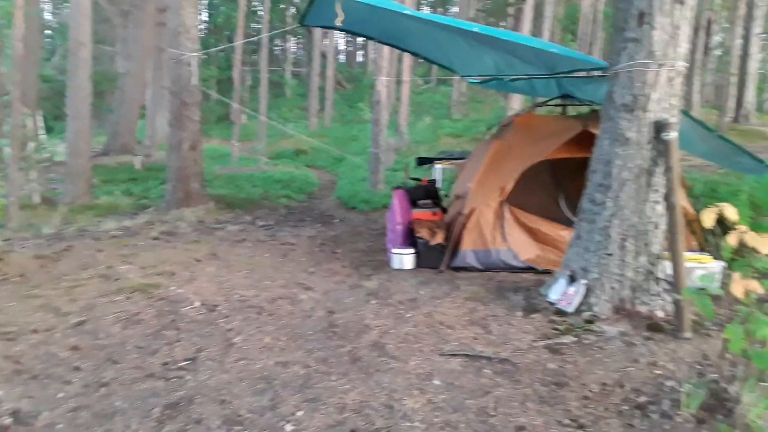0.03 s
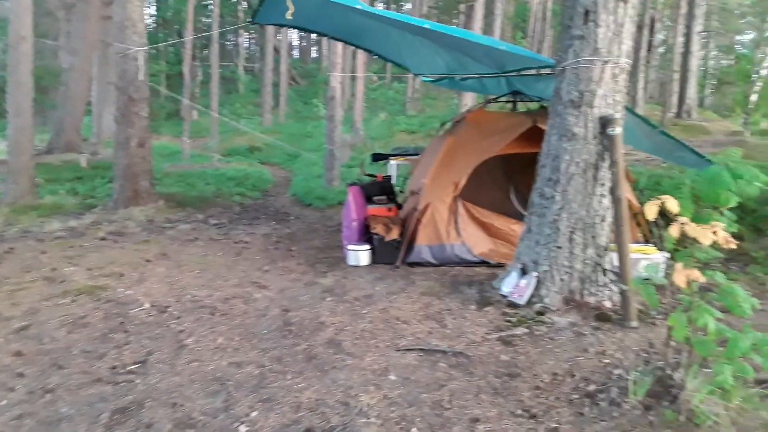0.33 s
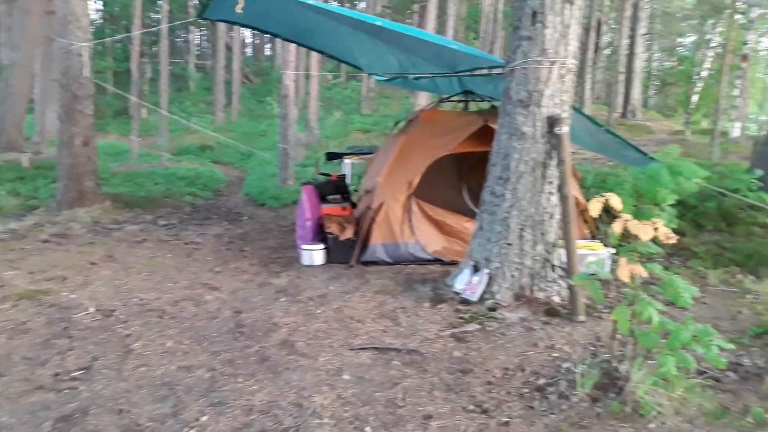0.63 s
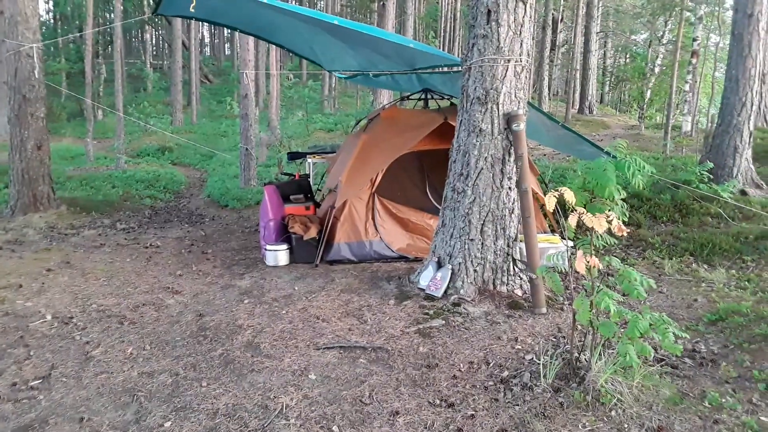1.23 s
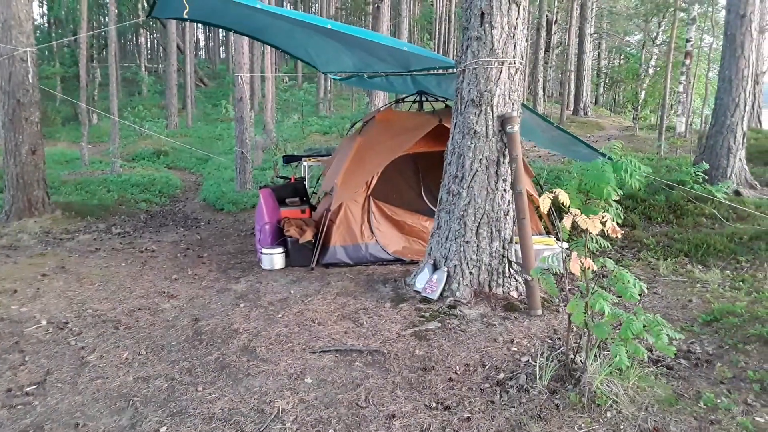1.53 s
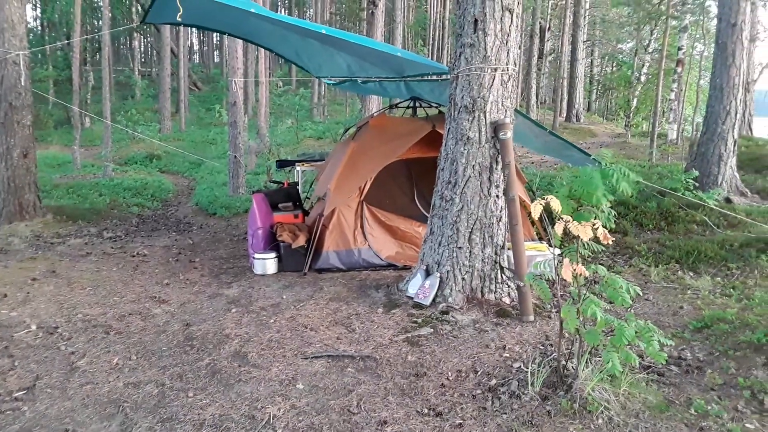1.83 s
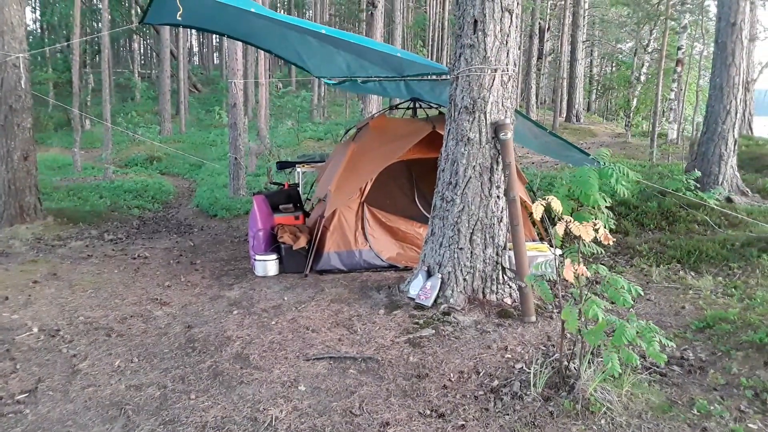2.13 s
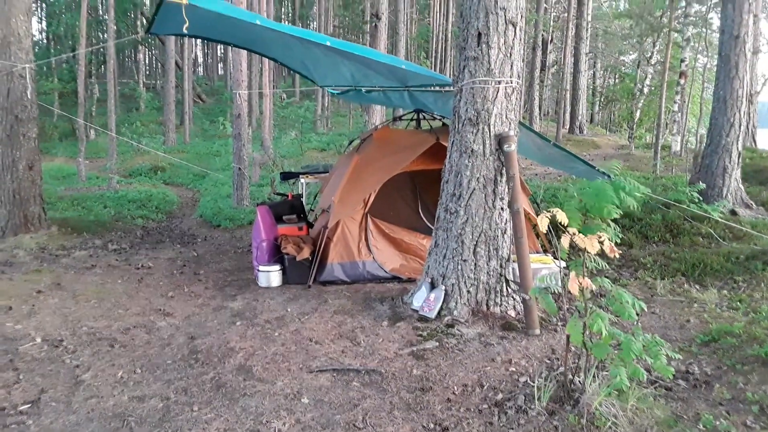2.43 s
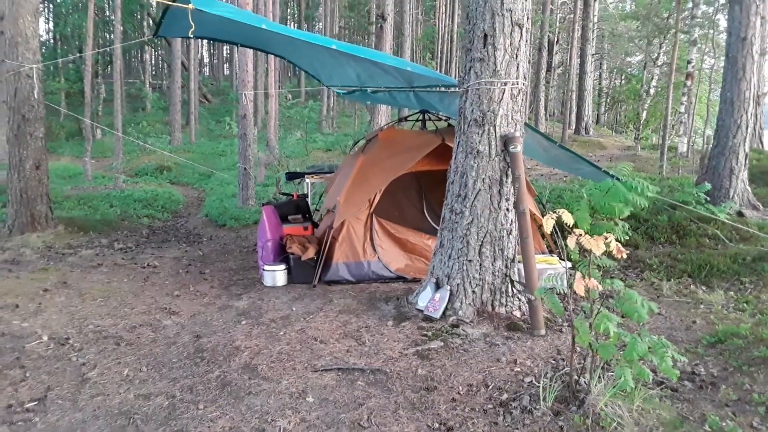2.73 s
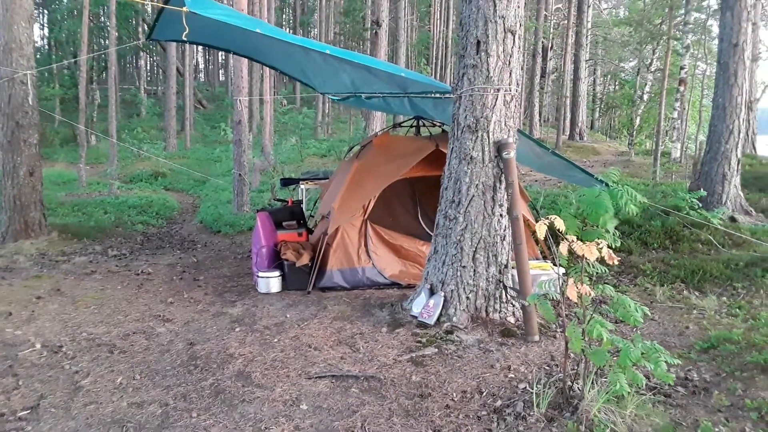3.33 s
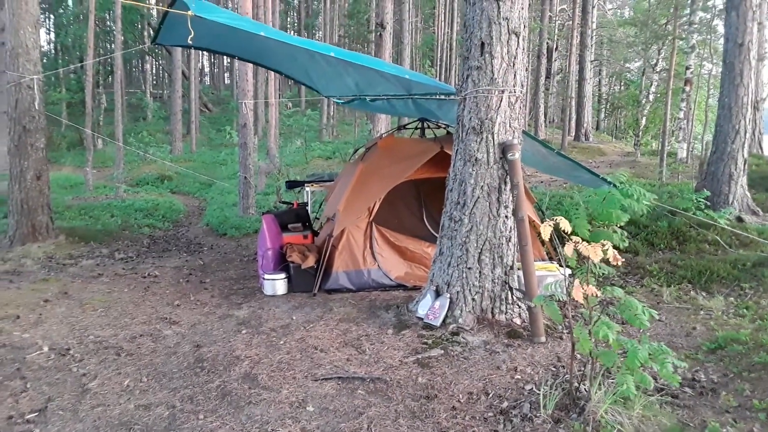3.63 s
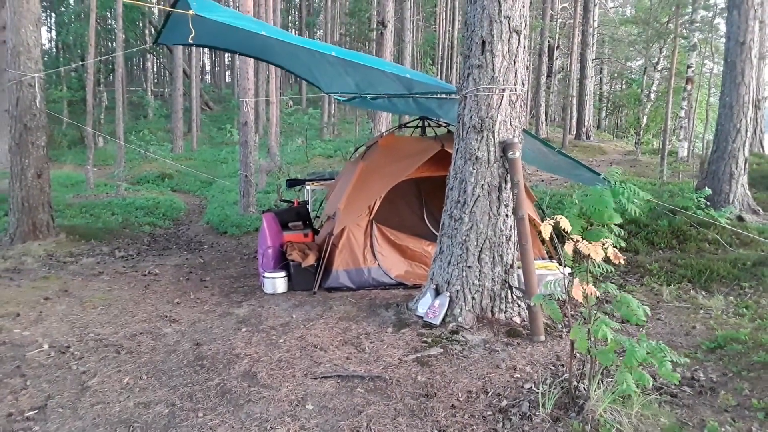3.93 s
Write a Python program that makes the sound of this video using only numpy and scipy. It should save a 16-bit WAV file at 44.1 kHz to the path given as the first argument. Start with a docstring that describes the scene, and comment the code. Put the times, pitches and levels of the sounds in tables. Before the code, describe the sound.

Soft wind hisses in pine needles and rustles shrubs at a forest campsite. After an opening low bump, uneven eddies buffet the hand-held microphone, strongest early on, while twigs tick faintly now and then.

```python
"""Light wind in a pine wood

Heard from a hand-held microphone at a campsite. After a low bump at the very start, eddies rumble
and bump on the microphone. The far wood gives a dull roar and its crowns a soft rush; shrubs rustle,
and nearby needles and leaves brush together in a bright hiss with a few dry ticks.
A faint, very high sizzle comes and goes in the second half."""
import sys
import numpy as np
from scipy import signal
from scipy.fft import irfft
from scipy.io import wavfile
from scipy.ndimage import uniform_filter1d

SR = 44100
rng = np.random.default_rng(int(sys.argv[2]) if len(sys.argv) > 2 else 0)


def to_wav(s):
    """Save 16-bit WAV."""
    ch = np.atleast_2d(s).T  # columns
    pcm = np.round(np.clip(ch, -1, 1) * 32767)  # PCM
    wavfile.write(sys.argv[1], SR, pcm.astype(np.int16))


N = 176400


def undb(db):
    """Decibels to gain."""
    return 10 ** (np.asarray(db) / 20)


def curve(rows):
    """Straight lines through (time_s, value) rows."""
    return np.interp(np.arange(N) / SR, *np.array(rows).T)


def walk(rate_hz):
    """Smooth random drift, spread 1, about rate_hz new values a second."""
    hold = max(int(SR / rate_hz), 2)
    steps = np.repeat(rng.standard_normal(N // hold + 2), hold)
    drift = uniform_filter1d(uniform_filter1d(steps, hold), hold)[:N]
    return drift / drift.std()


def noise_spectrum(colour):
    """Random-phase spectrum of unit-rms noise, shaped by (freq_hz, relative_db) rows."""
    hz, db = np.array(colour).T
    bin_hz = np.maximum(np.arange(N // 2 + 1) * SR / N, 1)
    gain = undb(np.interp(np.log(bin_hz), np.log(hz), db, left=-120, right=-120))
    spectrum = gain * np.exp(2j * np.pi * rng.random(len(bin_hz)))
    return spectrum / irfft(spectrum, N).std()


def noise(colour):
    """Steady coloured noise, rms 1."""
    return irfft(noise_spectrum(colour), N)


def restless(colour, sway_db, flicker_db, bands=16):
    """Unit-rms noise whose half-octave bands sway slowly and flicker quickly, each on its own."""
    spectrum = noise_spectrum(colour)
    bin_hz = np.maximum(np.arange(len(spectrum)) * SR / N, 1)
    band = np.clip(2 * np.log2(bin_hz / 100), 0, bands - 1)  # half-octaves above 100 Hz
    out = np.zeros(N)
    for k in range(bands):
        level_db = sway_db * walk(4) + flicker_db * walk(22)
        triangle = np.maximum(1 - np.abs(band - k), 0)
        out += undb(level_db) * irfft(spectrum * triangle, N)
    return out / out.std()


def roar(gain_db=2.5):
    """Dull, even roar of wind in the whole distant wood."""
    # wind in the wood: time_s, relative_db
    wind = [(0, -56.5), (0.18, -58.5), (0.45, -59.3), (0.9, -61.8), (1.3, -60.5), (1.6, -60), (1.95, -63.0),
            (2.3, -60), (2.75, -62.5), (3.05, -59), (3.3, -63), (3.65, -61), (4.0, -61)]
    # roar spectrum: freq_hz, relative_db
    colour = [(60, -8), (200, 5.5), (400, 2.5), (600, 1), (800, -2.5), (1100, -12.5), (1800, -21)]
    return restless(colour, sway_db=0.13, flicker_db=1.8) * undb(curve(wind) + gain_db)


def crowns(gain_db=1):
    """Soft, swelling rush of wind in distant treetops."""
    # wind in the crowns: time_s, relative_db
    wind = [(0, -62.2), (0.2, -62), (0.5, -61), (0.85, -64), (1.25, -63.3), (1.45, -61.5), (1.63, -59.5),
            (1.92, -65), (2.2, -62), (2.45, -62.5), (2.7, -60), (2.9, -64), (3.3, -62), (3.7, -62.7),
            (3.97, -58.5)]
    # rush spectrum: freq_hz, relative_db
    colour = [(400, -12), (750, -2.5), (1000, -1), (1280, 1), (1600, -0.8), (2000, -4.5), (2700, -13),
              (4000, -26), (8000, -50)]
    return restless(colour, sway_db=1.4, flicker_db=1.3) * undb(curve(wind) + gain_db)


def undergrowth(gain_db=-1.5, grain_db=2, grain_rate_hz=300):
    """Low shrubs rustle in small irregular grains."""
    # wind in the shrubs: time_s, relative_db
    wind = [(0, -60.5), (0.2, -61.5), (0.5, -61.5), (0.85, -66.0), (1.25, -67.5), (1.45, -64), (1.6, -62.5),
            (1.95, -66), (2.3, -65.5), (2.95, -66.2), (3.25, -66.5), (3.65, -63), (4.0, -64)]
    # rustle spectrum: freq_hz, relative_db
    colour = [(1300, -15), (1900, -2.5), (2400, 0), (3100, -2), (4000, -4.5), (5500, -11), (9000, -28)]
    rustle = restless(colour, sway_db=0.4, flicker_db=0.74)
    return rustle * undb(curve(wind) + gain_db + grain_db * walk(grain_rate_hz))


def sizzle(start_s=2.32, end_s=3.17, attack_s=0.06, release_s=0.26, level_db=-69.5):
    """Thin, very high sizzle, perhaps an insect: attack, hold, release."""
    # sizzle spectrum: freq_hz, relative_db
    colour = [(8500, -7), (9900, -1), (10450, -1), (11150, -6), (12000, -2), (12700, -6), (13200, -11),
              (14000, -25.5)]
    t = np.arange(N) / SR
    rise = (t - start_s) / attack_s
    fall = (end_s - t) / release_s
    envelope = np.clip(np.minimum(rise, fall), 0, 1)
    return noise(colour) * envelope * undb(level_db + 1.12 * walk(rate_hz=80))


def needles(gain_db=0.5, grain_db=1, grain_rate_hz=900):
    """Nearby needles and leaves brush each other: a bright, fine-grained hiss."""
    # wind in the needles: time_s, relative_db
    wind = [(0, -54), (0.45, -53.1), (0.8, -55), (1.25, -55.0), (1.57, -53.5), (1.88, -55), (2.12, -54.5),
            (2.5, -55), (2.8, -56), (3.15, -55.5), (3.5, -54.1), (4.0, -55.5)]
    # hiss spectrum: freq_hz, relative_db
    colour = [(1500, -22.5), (3000, -17), (4200, -16), (5200, -10.5), (6500, -6), (7200, -2), (7700, 0),
              (8200, -4), (9000, -11.5), (10000, -19.5), (11350, -26.5), (11980, -24.5), (13000, -32),
              (15500, -33.5)]
    hiss = restless(colour, sway_db=0.4, flicker_db=0.5)
    return hiss * undb(curve(wind) + gain_db + grain_db * walk(grain_rate_hz))


def ticks(lowpass_hz=8400):
    """Twigs and needles snap and tap: each a fast-dying noise burst through one resonance."""
    # snaps and taps: start_s, peak_db (before the low-pass), pitch_hz, width_hz, decay_ms
    snaps = [(.497, -39, 8000, 3000, 1.7), (0.505, -39, 8000, 3000, 1.6), (.552, -46, 2270, 400, 5),
             (.575, -45, 1620, 400, 2.9), (.603, -45.5, 1900, 300, 6.1), (0.9053, -35.5, 4500, 12000, 1.0),
             (1.362, -43, 5500, 3000, 1.5), (1.783, -42, 7500, 3000, 1.5), (2.235, -46.5, 1270, 200, 9.6),
             (2.525, -30.5, 7800, 900, 1.1), (3.228, -48, 2940, 800, 4), (3.347, -50.5, 2070, 198.8, 7.5),
             (3.525, -44, 9500, 2500, 2)]
    t = np.arange(N) / SR
    out = np.zeros(N)
    for start_s, peak_db, pitch_hz, width_hz, decay_ms in snaps:
        span = (t >= start_s) & (t < start_s + 0.08)
        decay = np.exp(-(t[span] - start_s) * 1000 / decay_ms)
        burst = rng.standard_normal(4096)[:len(decay)] * decay
        resonance = signal.iirpeak(pitch_hz, pitch_hz / width_hz, fs=SR)
        tick = signal.lfilter(*resonance, burst)
        out[span] += undb(peak_db) * tick / np.abs(tick).max()
    return signal.sosfilt(signal.butter(2, lowpass_hz, fs=SR, output="sos"), out)


def bumps(low_cut_hz=43, ring_hz=93, ring_q=1.01):
    """Each bump is a brief dip; the microphone's bass roll-off makes it swing once or twice."""
    # a low bump at the very start, then strong eddies on the microphone: centre_s, peak_db, sigma_ms
    pulses = [(0.011, -25.5, 2.6), (0.106, -28.5, 1.7), (0.283, -24, 1.9), (0.31, -22.0, 2.3),
              (0.382, -27.5, 1.02), (0.472, -26, 2), (0.541, -25.5, 2.7), (0.614, -27, 1.9),
              (0.642, -23.5, 2.5), (0.686, -24.5, 1.04), (0.829, -27.5, 2.1), (0.98, -26, 2.6),
              (1.074, -22.5, 1.01), (1.157, -27, 0.88), (1.178, -23, 0.54), (1.209, -19, 2.34),
              (1.246, -17.5, 1.53), (1.362, -25.5, 1.76), (1.736, -28, 2.45), (1.837, -20.5, 1.68),
              (2.103, -30, 2.07), (2.24, -29.0, 1.8), (2.396, -29, 2.5), (2.519, -29, 2.7),
              (2.625, -23.5, 1.7), (2.731, -27.0, 1.8), (2.83, -26, 1.5), (2.923, -28.5, 2.7),
              (3.369, -25.5, 2.45), (3.416, -27, 1.44), (3.607, -26.0, 1.18), (3.904, -28.5, 2.65)]
    t = np.arange(N) / SR
    omega = 2 * np.pi * ring_hz
    ring = signal.bilinear([1, 0, 0], [1, omega / ring_q, omega ** 2], fs=SR)
    low_cut = signal.butter(2, low_cut_hz, "high", fs=SR)
    out = np.zeros(N)
    for centre_s, peak_db, sigma_ms in pulses:
        span = np.abs(t - centre_s) < 0.1
        dip = -np.exp(-0.5 * ((t[span] - centre_s) * 1000 / sigma_ms) ** 2)
        bump = signal.lfilter(*ring, signal.lfilter(*low_cut, dip))
        out[span] += undb(peak_db) * bump / np.abs(bump).max()
    return out


def rumble(gain_db=-1, churn_db=3.5, churn_rate_hz=40):
    """Turbulence on the microphone: churning low noise that follows the gusts."""
    # wind at the microphone: time_s, relative_db
    gusts = [(0.0, -33), (0.2, -41), (0.3, -30), (0.42, -37), (0.62, -31.5), (0.85, -36.5), (1.05, -34),
             (1.22, -32), (1.31, -39), (1.45, -39), (1.77, -45.5), (1.87, -32.5), (1.96, -44), (2.2, -38.5),
             (2.34, -44.5), (2.43, -36), (2.58, -40), (2.9, -35.5), (3.02, -41), (3.17, -43.5),
             (3.42, -38.5), (3.55, -41), (3.63, -37), (3.82, -42), (4.0, -42.5)]
    # turbulence spectrum: freq_hz, relative_db
    colour = [(20, -25), (32, -8), (45, -4), (62, 2.5), (95, -1), (125, -5.5), (165, -13), (240, -28),
              (400, -39.5), (900, -85)]
    air = noise(colour)
    air /= np.sqrt(uniform_filter1d(air ** 2, size=3500))  # even out the rms over about 80 ms
    churn = np.tanh(walk(churn_rate_hz))
    return air * undb(curve(gusts) + gain_db + churn_db * churn)


def scene():
    """The wood plus low bumps and wind rumble, mono."""
    wood = roar() + crowns() + needles() + ticks() + sizzle() + undergrowth()
    return (wood + bumps() + rumble())[None, :]


def record(dry):
    """Steep low-pass at 15.7 kHz."""
    return signal.sosfilt(signal.ellip(10, 0.1, 80, 15700, fs=SR, output="sos"), dry)


dry = scene()
out = record(dry)
to_wav(out)
```